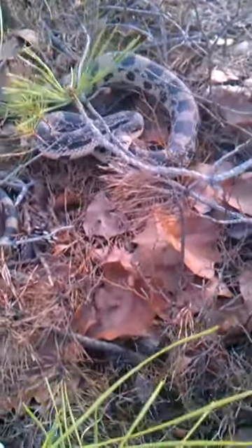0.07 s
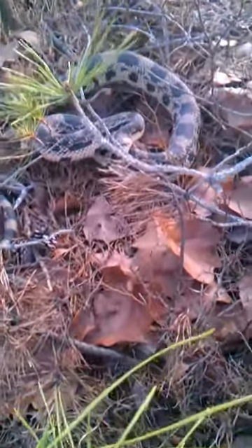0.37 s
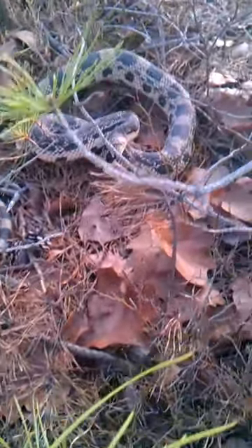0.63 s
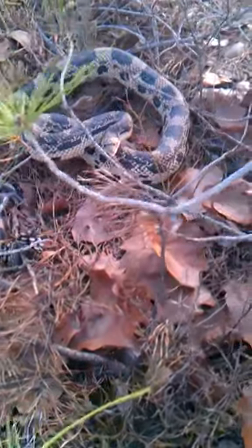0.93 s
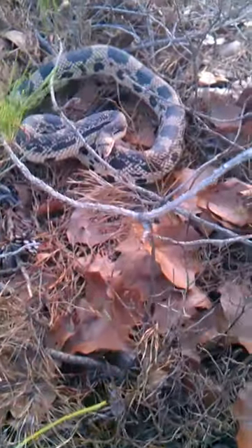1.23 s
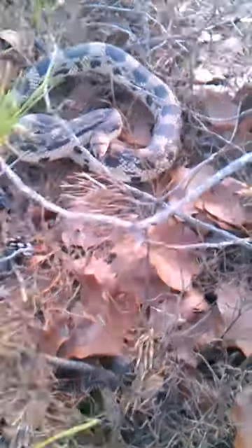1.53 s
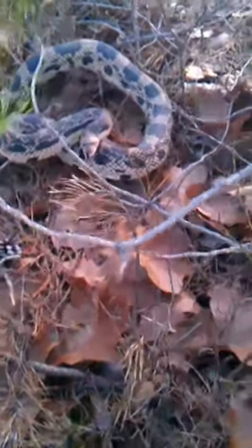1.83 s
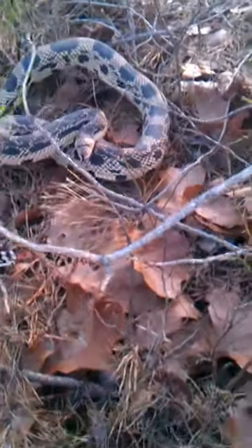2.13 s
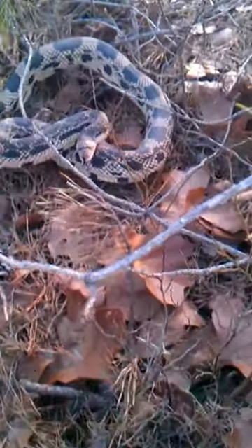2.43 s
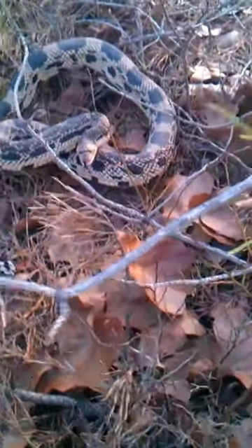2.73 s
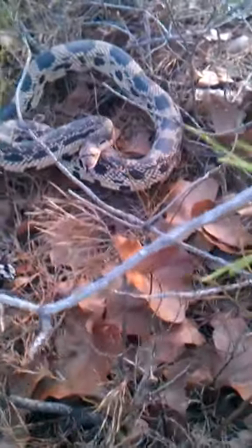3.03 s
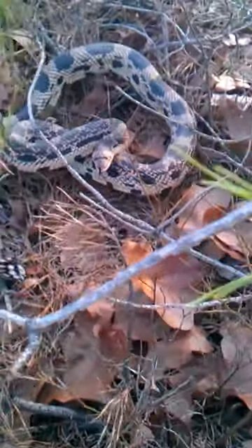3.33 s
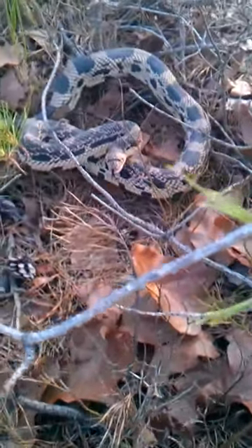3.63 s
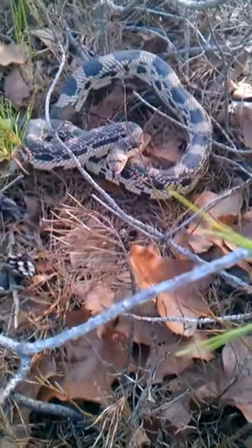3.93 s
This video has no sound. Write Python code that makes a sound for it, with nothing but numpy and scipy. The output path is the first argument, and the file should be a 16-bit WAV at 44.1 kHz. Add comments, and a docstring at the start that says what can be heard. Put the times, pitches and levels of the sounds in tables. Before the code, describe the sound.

One sustained snake hiss, heard close up in a quiet forest, grows louder and gains a high sizzle. Scattered twig snaps, leaf rustles and crunches of litter break through it, with a few soft bumps later on.

```python
"""A forest floor, with one microphone close to a snake. It gives one long hiss that swells and brightens:
rushing air rings in its throat and mouth, whose narrow resonances shift from posture to posture.
Close by, dry leaves rustle, twigs snap, pine needles scratch, the litter crunches and sticks knock,
with a few soft bumps later on. The quiet of the forest lies behind it all."""
import sys
import numpy as np
from scipy import signal
from scipy.fft import rfft, irfft, next_fast_len
from scipy.io import wavfile
from scipy.ndimage import map_coordinates

SR = 44100
rng = np.random.default_rng(int(sys.argv[2]) if len(sys.argv) > 2 else 0)


def int16_out(signal):
    """Quantize to a 16-bit WAV file."""
    q = np.round(np.clip(np.atleast_2d(signal).T, -1, 1) * 32767)
    wavfile.write(sys.argv[1], SR, q.astype(np.int16))


N = 176400

# colour of the forest background (frequency [Hz], level [dB])
FOREST_COLOUR = [(20, -18), (50, -8), (120, -6), (300, 2.5), (600, 3), (900, -5.5), (1350, 9.5), (2000, -1),
                 (4000, -2), (8000, -18.5), (12000, 2.5), (15500, -11.5)]
# force of the hiss, and strength of its treble sizzle (time [s], level [dB])
HISS_FORCE = [(0.0, -41), (0.13, -43), (0.63, -38), (1.59, -37.5), (2.65, -33.5), (3.66, -35.5),
              (4.0, -40.5)]
SIZZLE_LEVEL = [(0.0, -89), (0.21, -57), (0.48, -53), (1.02, -49.5), (1.15, -48), (2.57, -38), (3.53, -38),
                (3.82, -40), (4.0, -42.5)]
# broad colours of the rushing air and its sizzle (frequency [Hz], level [dB])
AIR_COLOUR = [(150, -41.5), (500, -11), (1400, -14), (2100, -11), (2800, -6.5), (3550, 2.5), (4800, 1.5),
              (5700, -6), (8200, -6), (9200, -10.5), (12000, -15), (16000, -19)]
SIZZLE_COLOUR = [(3000, -24), (6000, -7.5), (8300, -1.5), (9100, -5.5), (10100, 0), (10800, 2),
                 (11200, 0.5), (11700, -13), (12150, -3), (12700, -20), (14500, -8), (15700, -11)]
# resonances of throat and mouth in four postures (frequency [Hz], width [Hz], level [dB])
MOUTH_NARROW = [(4148, 104, 0), (4130, 140, -20), (4680, 74, -5), (5040, 270, -12)]
MOUTH_OPENING = [(2330, 110, -8), (3580, 450, -2.5), (4140, 210, 6), (4380, 105, 5), (4760, 110, 3.5),
                 (5060, 190, -2), (5360, 140, 6.5), (6130, 89, -14), (6630, 56, 7), (7250, 94, 0.5),
                 (7970, 99, 3), (8050, 140, -14), (8600, 160, -6.5), (10350, 590, -7.5)]
MOUTH_WIDE = [(2280, 110, -8.5), (3470, 200, 0), (4150, 310, 1), (4900, 95, 4.5), (5240, 160, -0.5),
              (5570, 120, -12), (6160, 140, -10), (6600, 160, -4), (6780, 270, 1), (7400, 200, 4),
              (8050, 140, -5), (8300, 150, -4), (9400, 160, -7), (11030, 290, -2)]
MOUTH_LAST = [(520, 220, -13.5), (1430, 150, -11), (2380, 67, -10), (2620, 83, -11), (3034, 82, -1),
              (3730, 230, 3.5), (4270, 360, 3), (4940, 260, 3.5), (5670, 200, 1), (6450, 350, 1),
              (6900, 130, 0), (7500, 73, 6.5), (8260, 140, 3), (8560, 150, 2), (9270, 130, 2.5),
              (10700, 170, -7), (12000, 310, -2)]
# ringing at the start and end of each held posture, relative to the force (time [s], level [dB])
POSTURE_RINGING = [(.1, -5), (.65, -4), (1.15, -4.5), (2.05, -5.5), (2.8, -6), (3.25, -3), (3.55, -0.5),
                   (4, 3)]
# stirring of the leaves near the microphone (time [s], level [dB])
LEAF_STIR = [(0, -74), (.18, -56), (.3, -47.5), (.42, -48.5), (.5, -52.5), (.61, -46), (.73, -40),
             (.8, -54.5), (1.4, -61), (1.98, -49), (2.08, -40.5), (2.17, -50), (2.4, -39.5), (2.58, -41.5),
             (2.68, -36), (2.76, -37.5), (2.79, -58), (2.95, -51), (3.05, -45), (3.25, -59), (4, -66)]
# breaks and contacts on the ground (time [s], level [dB], 60 dB decay time [s])
TWIG_SNAPS = [(.239, -26.5, 0.0095), (.31, -27, .01), (.318, -25.5, 0.008), (.4745, -24, 0.0098),
              (.522, -19.5, 0.019), (.557, -13, 0.0065), (.588, -25, 0.019), (.6285, -19, .008),
              (.6465, -21.5, .015), (.707, -17.5, 0.012), (.726, -32, .02), (2.056, -24, 0.015),
              (2.09, -23, 0.021), (2.3625, -16, 0.02), (2.611, -19, 0.011), (2.6405, -14, 0.014),
              (2.6637, -7.5, 0.0089), (2.668, -14, 0.017), (2.675, -12, 0.014), (2.684, -17, .02),
              (2.716, -13, 0.015), (2.7272, -14, 0.0086), (2.939, -13, 0.01), (3.022, -19, 0.013),
              (3.042, -14, .008), (3.057, -21, 0.016)]
NEEDLE_SCRATCHES = [(.345, -39, 0.13), (.378, -28.5, 0.032), (.395, -34, 0.11), (.695, -19.5, 0.023),
                    (1.637, -21, .012), (1.735, -29, .008)]
LITTER_CRUNCHES = [(.69, -17.5, 0.015), (.695, -22, 0.023), (.707, -33, .025), (1.518, -29.5, .07),
                   (1.595, -26, 0.013), (1.619, -25, 0.02), (2.362, -18, 0.014), (2.48, -20, 0.021),
                   (2.555, -30, .02), (2.61, -22.5, 0.024), (2.664, -13.5, 0.021), (2.715, -21, 0.078),
                   (2.764, -26, 0.038), (3.077, -25, 0.017), (3.098, -26, 0.052), (3.201, -27, .015),
                   (3.423, -17, 0.0081), (3.4483, -15, 0.017), (3.535, -16, 0.011)]
SOFT_BUMPS = [(1.672, -36.5, 0.043), (1.935, -50, 0.083), (2.985, -54, 0.11), (3.358, -35, 0.061),
              (3.448, -29, .05), (3.472, -34, 0.038)]
# colours of those sounds on the ground (frequency [Hz], level [dB])
LEAF_COLOUR = [(120, -37), (550, -2), (1200, 3.5), (2200, 5.5), (3200, -0.5), (4300, -6), (6000, 13),
               (7300, -0.5), (9000, -6), (12500, -1), (15500, -26)]
TWIG_COLOUR = [(200, -34), (700, -16), (1800, -6.5), (2800, -3), (4300, -0.5), (5600, 6.5), (7200, 3.5),
               (8800, -10.5), (15000, -12)]
NEEDLE_COLOUR = [(1000, -14), (5000, -3), (7500, -2), (10000, -2), (12300, -3), (13500, -6), (15700, -6.5)]
LITTER_COLOUR = [(40, -36), (150, -23), (480, -13), (750, -5), (1200, -1.5), (1800, 1), (2600, -2.5),
                 (4500, -3.5), (8000, -12), (15000, -46)]
SOFT_BUMP_COLOUR = [(20, -13), (50, -2), (100, -7.5), (270, 0.5), (420, -12), (1000, -36), (4000, -41)]
# hollow knocks of sticks (time [s], level [dB], 60 dB decay time [s], pitch [Hz])
STICK_KNOCKS = [(.69, -23.5, 0.039, 790), (0.6968, -26.5, .03, 840), (.707, -23.5, 0.026, 800),
                (0.904, -34.5, 0.03, 880), (0.968, -37, 0.032, 880), (1.524, -28.5, 0.047, 925),
                (1.564, -33, 0.032, 560), (1.619, -34.5, 0.029, 610), (1.647, -28.5, 0.039, 640),
                (1.682, -36.5, 0.033, 656), (1.742, -30.5, 0.015, 796), (1.82, -34, 0.027, 590),
                (1.989, -37, 0.047, 525), (2.015, -36.5, .05, 850), (2.124, -35.5, 0.023, 570),
                (2.143, -32.5, 0.018, 580), (2.179, -33, 0.041, 620), (2.612, -31, 0.026, 500),
                (2.72, -35, 0.032, 865)]
# colour of a knocked stick (frequency [multiple of its pitch], level [dB])
STICK_COLOUR = [(.15, -34), (.6, -17), (.8, -3), (1.1, -1), (1.4, -10), (3.2, -21), (10, -35)]


def amp(db):
    """Decibels as an amplitude factor."""
    return 10 ** (np.asarray(db) / 20)


def unit(x):
    """x scaled to rms 1."""
    return x / np.sqrt(np.mean(x ** 2) + 1e-20)


def curve(rows):
    """One value per sample from (time [s], value) rows."""
    return np.interp(np.arange(N) / SR, *np.transpose(rows))


def wobble(per_s):
    """A smooth random curve with per_s knots a second."""
    knots = rng.standard_normal(int(N * per_s / SR) + 4)
    return map_coordinates(knots, [np.arange(N) * per_s / SR])


def colour(points):
    """Gain against frequency from (frequency [Hz], level [dB]) points on a log axis."""
    point_hz, db = np.transpose(points)
    return lambda hz: amp(np.interp(np.log(hz + 1), np.log(point_hz + 1), db))


def filtered(x, response):
    """x with its spectrum multiplied by response(hz)."""
    size = next_fast_len(N + SR // 2)
    return irfft(rfft(x, size) * response(np.fft.rfftfreq(size, 1 / SR)), size)[:N]


def noise(response):
    """Coloured noise of rms 1."""
    return unit(filtered(rng.standard_normal(N), response))


def ring(points, uneven_db, size=4096):
    """Impulse response of one piece of litter, energy 1: a colour with random resonances of its own."""
    hz = np.fft.rfftfreq(size, 1 / SR)
    ripple = map_coordinates(rng.standard_normal(80), [np.sqrt(hz) / 2])
    gain = colour(points)(hz) * amp(uneven_db * ripple)
    # minimum phase, so the ringing follows the impulse
    cepstrum = irfft(np.log(gain + 1e-6))
    cepstrum[1:size // 2] *= 2
    cepstrum[size // 2 + 1:] = 0
    response = irfft(np.exp(rfft(cepstrum)))
    return response / np.linalg.norm(response)


def bursts(rows, points, gain_db, attack_s):
    """Each break or contact is a fast-dying burst of noise that rings its own piece of litter."""
    track = np.zeros(N + SR)
    t = np.arange(SR // 6) / SR
    for start_s, db, t60 in rows:
        envelope = amp(-60 * t / t60) * (1 - np.exp(-t / attack_s))
        burst = signal.fftconvolve(envelope * rng.standard_normal(len(t)), ring(points, uneven_db=1.5))
        burst *= np.linalg.norm(envelope) / np.linalg.norm(burst)
        track[round(start_s * SR):][:len(burst)] += amp(db + gain_db) * burst
    return track[:N]


def forest(level_db=-53, drift_db=1.05):
    """The background of the place: faint noise whose level drifts a little."""
    return amp(level_db + drift_db * wobble(per_s=7.9)) * noise(colour(FOREST_COLOUR))


def throat(resonances, waver=0.003):
    """Turbulence rings in the steep resonances of one posture, which waver slightly in pitch."""
    def response(hz):
        peaks = [amp(db) / (1 + (1.63 * (hz - centre) / width) ** 2) for centre, width, db in resonances]
        return np.linalg.norm(peaks, axis=0)

    steady = noise(response)
    speed = 1 + waver * wobble(per_s=9)
    return unit(map_coordinates(steady, [np.cumsum(speed)], mode="wrap"))


def hiss(air_db=-6, sizzle_db=2, flutter_db=1.09):
    """The snake's one long jet of air: its resonances pass from posture to posture, its treble grows."""
    postures = [MOUTH_NARROW, MOUTH_OPENING, MOUTH_WIDE, MOUTH_LAST]
    times = np.transpose(POSTURE_RINGING)[0]
    # each posture holds between two times, then fades into the next at equal power
    shares = np.repeat(np.eye(len(postures)), 2, axis=1)
    fades = [np.sqrt(curve(list(zip(times, share)))) for share in shares]
    ringing = sum(fade * throat(posture) for fade, posture in zip(fades, postures))
    air = amp(air_db) * noise(colour(AIR_COLOUR))
    body = amp(curve(HISS_FORCE)) * (air + amp(curve(POSTURE_RINGING)) * ringing)
    sizzle = amp(curve(SIZZLE_LEVEL) + sizzle_db) * noise(colour(SIZZLE_COLOUR))
    return (body + sizzle) * amp(flutter_db * wobble(per_s=110))


def leaf_rustle(leaves=14, slips_per_s=1800, spread_db=6, flutter_db=1.85):
    """Dry leaves close to the microphone, each crackling with tiny random slips."""
    crackle = np.zeros(N)
    for _ in range(leaves):
        slips = rng.random(N) < slips_per_s / leaves / SR
        strength = amp(spread_db * np.clip(rng.standard_normal(N), -2, 2))
        polarity = np.sign(rng.standard_normal(N))
        crackle += signal.fftconvolve(slips * strength * polarity, ring(LEAF_COLOUR, uneven_db=2))[:N]
    return amp(curve(LEAF_STIR)) * unit(crackle) * amp(flutter_db * wobble(per_s=60))


def twig_snaps():
    """Twigs and needles break with sharp, bright clicks."""
    return bursts(TWIG_SNAPS, TWIG_COLOUR, gain_db=-4, attack_s=0.00023)


def needle_scratches():
    """Pine needles scratch, thin and high."""
    return bursts(NEEDLE_SCRATCHES, NEEDLE_COLOUR, gain_db=-3.5, attack_s=0.0003)


def litter_crunches():
    """Leaf litter crunches, duller than the snaps."""
    return bursts(LITTER_CRUNCHES, LITTER_COLOUR, gain_db=-6, attack_s=0.00048)


def stick_knocks():
    """Knocked sticks ring briefly and hollowly, each around its own pitch."""
    track = np.zeros(N)
    for start_s, db, t60, pitch_hz in STICK_KNOCKS:
        points = [(multiple * pitch_hz, level) for multiple, level in STICK_COLOUR]
        track += bursts([(start_s, db, t60)], points, gain_db=-5, attack_s=0.0011)
    return track


def soft_bumps():
    """Soft contacts in the litter give low thuds."""
    return bursts(SOFT_BUMPS, SOFT_BUMP_COLOUR, gain_db=-6, attack_s=0.0015)


def scene():
    """Forest, snake and litter as they meet at the microphone, in mono."""
    contacts = twig_snaps() + needle_scratches() + litter_crunches() + stick_knocks() + soft_bumps()
    return (forest() + hiss() + leaf_rustle() + contacts)[None]


def record(dry, top_hz=15800):
    """The microphone keeps nothing above its band limit."""
    return filtered(dry[0], lambda hz: hz < top_hz)[None]


dry = scene()
out = record(dry)
int16_out(out)
```